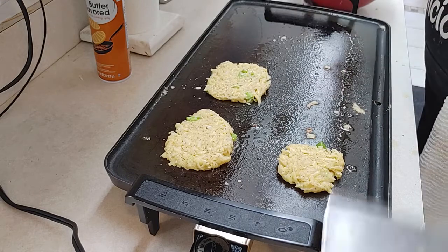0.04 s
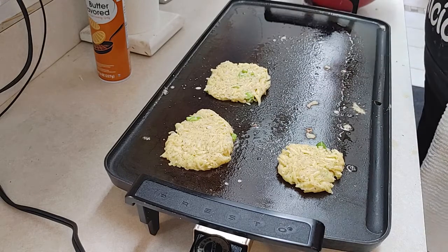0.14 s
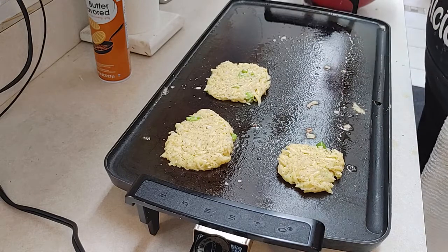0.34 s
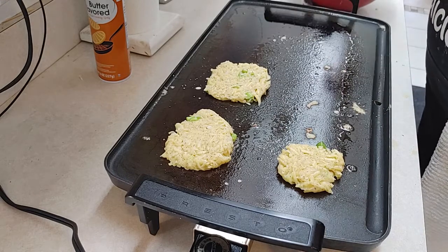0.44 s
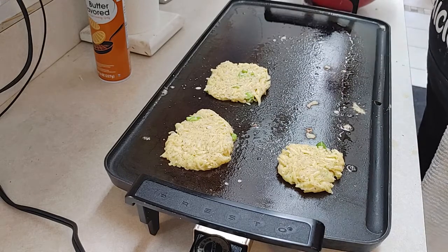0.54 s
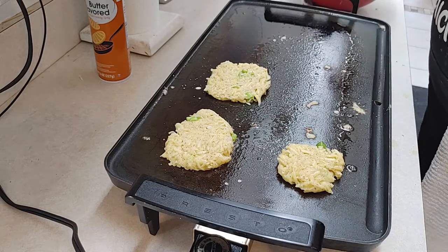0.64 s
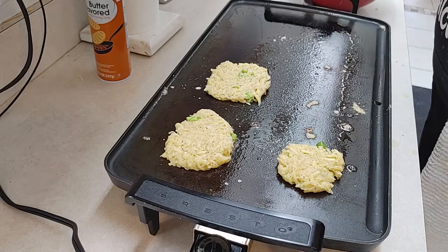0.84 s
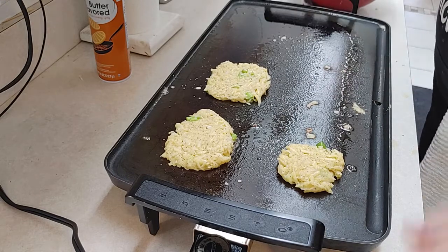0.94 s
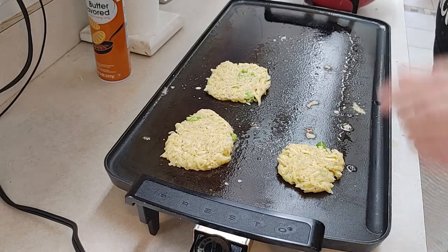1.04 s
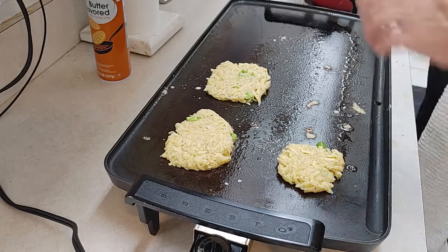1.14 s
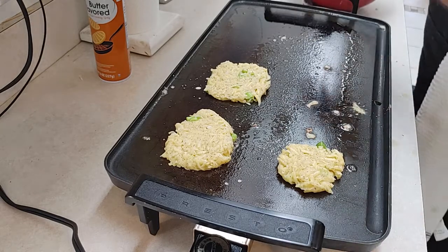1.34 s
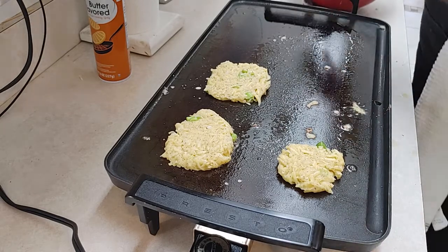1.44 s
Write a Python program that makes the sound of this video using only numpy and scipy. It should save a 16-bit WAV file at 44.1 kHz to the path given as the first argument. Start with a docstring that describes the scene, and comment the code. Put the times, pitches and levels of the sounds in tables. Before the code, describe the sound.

Metal spatula strikes a griddle with a ring, drags, then rattles to rest amid quiet frying.

```python
"""A metal spatula clinks on an electric griddle and rings, is dragged along it, then clatters to rest.
Clink: decaying blade modes, frame thud and a noise burst. Drag: random slips shake blade and plate,
plate modes sing, single tones squeal. Clatter: clicks with chatter excite blade and griddle modes.
Behind: pops of fat (filtered clicks), faint sizzle (crackle and hiss), low kitchen hum (coloured noise)."""
import sys
import numpy as np
from scipy import signal
from scipy.fft import rfft, irfft
from scipy.io import wavfile

SR = 44100
rng = np.random.default_rng(int(sys.argv[2]) if len(sys.argv) > 2 else 0)


def store_pcm(level_fs):
    """Save levels as 16-bit WAV."""
    pcm = np.round(np.clip(level_fs, -1, 1) * 32767).astype(np.int16)
    wavfile.write(sys.argv[1], SR, np.atleast_2d(pcm).T)


N = 66150
TIME = np.arange(N) / SR
HALVES = np.array([[.5], [-.5]])   # splits a left-right difference over the pair
CLINK_S, TOUCH_S = .1592, .3228   # blade strikes, then lands again and starts to slide
CONTACT_T60_S, ROOM_DB, ROOM_T60_S = 0.033, -7, 0.38   # shared by drag and clatter


def from_db(db):
    """Decibels to gain."""
    return 10 ** (np.asarray(db) / 20)


def rms_one(x):
    """Scale to rms 1."""
    return x / np.sqrt(np.mean(x ** 2) + 1e-20)


def at_hz(points, hz):
    """Read a table on a log-frequency axis."""
    f, value = np.transpose(points)
    return np.interp(np.log(hz + 1e-3), np.log(f), value)


def panned(db):
    """Left and right gains for a left-right difference."""
    return from_db(HALVES * db)


def through(x, response):
    """Convolve a signal with a stereo response."""
    return signal.fftconvolve(np.atleast_2d(x), response, axes=1)[:, :N]


def low_pass(x, hz):
    """First-order low-pass."""
    return signal.sosfilt(signal.butter(1, min(hz, SR / 3), fs=SR, output="sos"), x + 1e-18)


def high_pass(x, hz):
    """Second-order high-pass."""
    return signal.sosfilt(signal.butter(2, hz, "high", fs=SR, output="sos"), x + 1e-18)


def waver(hz):
    """Random motion, low-passed twice at hz; rms 1."""
    return rms_one(low_pass(low_pass(rng.standard_normal(N), hz), hz))


# microphone pair: (frequency [Hz], left-right likeness)
LIKENESS = [(100, 0.97), (350, 0.8), (700, 0), (1800, 0.05), (4000, 0.23), (9000, 0.06)]
# microphone pair: (frequency [Hz], left-right difference [dB])
BALANCE = [(150, -0.5), (600, -0.5), (1500, -1), (3300, -3), (7000, 0), (13000, 4)]


def noise(colour):
    """Coloured noise as the microphone pair hears it; rms 1."""
    hz = np.arange(N // 2 + 1) * SR / N
    mid, side = rfft(rng.standard_normal((2, N)))
    alike = np.clip(at_hz(LIKENESS, hz), -1, 1)
    pair = np.sqrt(1 + alike) * mid + np.sqrt(1 - alike) * side * [[1], [-1]]
    spectrum = pair * from_db(at_hz(colour, hz)) * panned(at_hz(BALANCE, hz))
    return rms_one(irfft(spectrum, N))


def narrow_band(hz, width_hz):
    """Stereo noise in a resonance whose centre may move; rms about 1."""
    phase = 2 * np.pi * np.cumsum(hz * np.ones(N)) / SR
    return np.array([waver(width_hz) * np.sin(phase) + waver(width_hz) * np.cos(phase) for _ in range(2)])


def dying(t60, start=0):
    """Envelope that jumps to 1 and decays 60 dB in t60."""
    return (TIME >= start) * np.exp(-np.log(1000) * np.maximum(TIME - start, 0) / t60)


def ring(hz, t60, pan_db=0, lead=0, start=0):
    """One struck mode in stereo; the left leads in phase by lead [rad]."""
    wave = np.sin(2 * np.pi * hz * (TIME - start) + HALVES * lead)
    return panned(pan_db) * dying(t60, start) * wave


def crack(colour, t60, room_db, room_t60):
    """Contact response: a short dense burst and its room tail; unit energy."""
    burst = dying(t60) / np.sqrt(t60)
    room = from_db(room_db) * dying(room_t60) / np.sqrt(room_t60)
    return rms_one(noise(colour) * np.hypot(burst, room)) / np.sqrt(N)


def grains(per_s, spread_db):
    """Random clicks of uneven size; rms 1."""
    sizes = from_db(spread_db * np.minimum(rng.exponential(1, N), 4)) * rng.choice([-1, 1], N)
    return rms_one(sizes * (rng.random(N) < per_s / SR))


# blade modes: frequency [Hz]
BLADE_HZ = [1659, 2591, 3612, 4404, 4871, 6386, 7048, 8172, 10311, 10548, 12025, 12772]
# same modes: (level [dB], free t60 [s], left-right difference [dB], left lead [rad])
BLADE = [(-29.5, 1, 3, 0.5), (-28, 0.8, -7.5, -1.75), (-23.5, 0.48, 5, 2.1), (-24.5, 0.33, 3.5, -3),
         (-21.5, 1, -5.5, 1.83), (-28, 0.52, -2.5, -1), (-21.5, 0.37, -1, 2), (-25, 0.21, 6, 9.5),
         (-20.5, 0.33, -4, 5), (-28, 0.32, -10, 2.5), (-19, 0.2, 9, 4.5), (-22, 0.2, -7, 3.5)]
# beat rate of the lower blade modes [Hz]
BEAT_HZ = [9.7, 9.1, 6.4, 4.6, 10.4, 2.7, 3.9]
BEAT_DEPTH = 0.14
RING_WANDER_HZ, RING_WANDER_SHARE = 21.5, 0.32   # rate at the third mode; scales with mode frequency
HELD_T60_S = 0.088   # while the blade touches


def free_blade():
    """The struck blade rings, directly and by wandering reflections, until it lands and is damped."""
    out = 0
    for k, (hz, (db, t60, pan_db, lead)) in enumerate(zip(BLADE_HZ, BLADE)):
        beat = 1
        if k < len(BEAT_HZ):
            beat = 1 + BEAT_DEPTH * np.cos(2 * np.pi * BEAT_HZ[k] * (TIME - CLINK_S))
        direct = beat * ring(hz, t60, pan_db, lead, CLINK_S)
        wander = narrow_band(hz, RING_WANDER_HZ * hz / BLADE_HZ[2])
        reflected = panned(pan_db) * dying(t60, CLINK_S) * wander
        out = out + from_db(db) * (direct + RING_WANDER_SHARE * reflected)
    return out * np.where(TIME < TOUCH_S, 1, dying(HELD_T60_S, TOUCH_S))


def held_blade():
    """Response of the blade while contact damps it."""
    return sum(from_db(db) * ring(hz, HELD_T60_S, pan_db, lead)
               for hz, (db, _, pan_db, lead) in zip(BLADE_HZ, BLADE))


# frame modes: (frequency [Hz], level [dB], t60 [s])
FRAME = [(133, -24, 0.19), (259.3, -28, 0.23), (381.5, -33.5, 0.27), (664, -36, 0.25), (1127, -20.5, 0.13),
         (1365, -26, 0.12)]
THUD_RISE_S = 0.01


def frame_thud():
    """Low modes of the frame, eased in under the clink."""
    modes = sum(from_db(db) * (-1) ** k * ring(hz, t60, start=CLINK_S)
                for k, (hz, db, t60) in enumerate(FRAME))
    return modes * np.clip((TIME - CLINK_S) / THUD_RISE_S, 0, 1)


# dense ring of the clink: (frequency [Hz], relative density [dB per Hz])
CLINK_COLOUR = [(60, -9), (150, -6), (400, -4.5), (750, -11.5), (1300, -2), (3000, 0.5), (6000, -4),
                (10000, -1), (16000, -11)]
SHIMMER_SPACING_HZ = 90   # mean


def shimmer():
    """Many weak plate modes at random pitches; rms 1."""
    chosen = rng.random(N // 2 + 1) < SR / N / SHIMMER_SPACING_HZ
    return rms_one(irfft(rfft(noise(CLINK_COLOUR)) * chosen, N))


CLINK_DB, CLINK_HOLD_S, CLINK_T60_S = -19.5, 0.027, 0.22
CLINK_TAIL_DB, CLINK_TAIL_T60_S, SHIMMER_DB = -35, 0.48, -27.5


def clink():
    """One hard blow: blade ring, frame thud, dense burst and weak modes that outlast it."""
    release_s = CLINK_S + CLINK_HOLD_S
    burst = np.where(TIME < release_s, TIME >= CLINK_S, dying(CLINK_T60_S, release_s))
    tail = dying(CLINK_TAIL_T60_S, CLINK_S)
    shape = from_db(CLINK_DB) * burst + from_db(CLINK_TAIL_DB) * tail
    dense = shape * noise(CLINK_COLOUR)
    return free_blade() + frame_thud() + dense + from_db(SHIMMER_DB) * tail * shimmer()


# griddle modes: (frequency [Hz], level [dB])
GRIDDLE = [(610, -17.5), (690, -14.5), (1415, -8.5), (1830, -5), (1910, -14.5), (2080, -7.5), (2592, -2),
           (2850, -11), (3634, -5), (4570, -9), (5830, -7), (7070, -12.5), (8570, -7), (10550, -8)]
GRIDDLE_T60_S, GRIDDLE_LEAD_RAD = 0.16, 0.67


def griddle():
    """Response of the cooking plate, its ring cut short by the food on it."""
    return sum(from_db(db) * ring(hz, GRIDDLE_T60_S, at_hz(BALANCE, hz), GRIDDLE_LEAD_RAD * (-1) ** k)
               for k, (hz, db) in enumerate(GRIDDLE))


SING_DB, SING_WIDTH_HZ, SING_SWELL_DB, SING_BEND = -32.5, 37.4, 4, 0.00605   # bend: rms share of pitch
SWELL_HZ = 9.1
RUB_LOW_CUT_HZ = 1400


def singing_plate():
    """As the contact point travels, each plate mode swells, fades and bends on its own."""
    out = 0
    for hz, db in GRIDDLE:
        swell = rms_one(from_db(SING_SWELL_DB * waver(SWELL_HZ)))
        moving_hz = hz * (1 + SING_BEND * waver(SWELL_HZ))
        mode = panned(at_hz(BALANCE, hz)) * narrow_band(moving_hz, SING_WIDTH_HZ)
        out = out + from_db(db) * swell * mode
    return from_db(SING_DB) * high_pass(out, RUB_LOW_CUT_HZ)


REFLECTION_S, REFLECTION_SHRINK_PER_S, REFLECTION_GAIN = 0.0021, 0.614, 0.41   # delay at touch


def swept(x):
    """A close plate reflection, its path shortening as the blade slides, cuts dips that climb."""
    delay = REFLECTION_S * np.exp(-REFLECTION_SHRINK_PER_S * (TIME - TOUCH_S))
    return x + REFLECTION_GAIN * np.array([np.interp(TIME - delay, TIME, side) for side in x])


# force of the drag: (time [s], level [dB])
DRAG = [(.323, 0.5), (.36, 1.5), (.41, -3), (.455, 1.5), (.51, -2), (.595, -3.5), (0.644, -5.5), (.69, -13),
        (.73, -16)]
# scrape spectrum: (frequency [Hz], relative level [dB])
SCRAPE_COLOUR = [(1000, -54), (1500, -10), (2200, 2.5), (3200, -5.5), (5000, -3.5), (9000, -8),
                 (12000, -17), (16000, -13)]
SLIPS_PER_S, SLIP_SPREAD_DB = 2500, 4
SCRAPE_DB, SCRAPE_BLADE_DB = -32, -40
RUB_UNEVEN_DB, RUB_UNEVEN_HZ = 1, 71   # pressure flutters as the edge catches
BITE_DB, BITE_T60_S, BITE_LOW_HZ, BITE_HIGH_HZ = -27.5, 0.25, 2130, 2650


def scrape():
    """The edge bites, then slips thousands of times a second, shaking blade and plate."""
    s, db = np.transpose(DRAG)
    sliding = (TIME > TOUCH_S) * (TIME < s[-1])
    force = from_db(np.interp(TIME, s, db) + RUB_UNEVEN_DB * waver(RUB_UNEVEN_HZ)) * sliding
    blade = from_db(SCRAPE_BLADE_DB) * rms_one(held_blade()) / np.sqrt(N)
    contact = high_pass(crack(SCRAPE_COLOUR, CONTACT_T60_S, ROOM_DB, ROOM_T60_S), RUB_LOW_CUT_HZ)
    body = blade + from_db(SCRAPE_DB) * contact
    slips = swept(through(force * grains(SLIPS_PER_S, SLIP_SPREAD_DB), body))
    band = signal.butter(2, [BITE_LOW_HZ, BITE_HIGH_HZ], "band", fs=SR, output="sos")
    bite = dying(BITE_T60_S, TOUCH_S) * rms_one(signal.sosfilt(band, noise(SCRAPE_COLOUR)))
    return slips + force * singing_plate() + from_db(BITE_DB) * bite


# edge grips, one resonance sings: (middle [s], length [s], frequency [Hz], level [dB])
SQUEALS = [(0.344, 0.05, 2592, -27), (0.444, 0.099, 668, -47), (0.465, 0.051, 2592, -28),
           (0.501, 0.043, 1900, -27), (0.586, 0.038, 671, -42.5), (0.644, 0.11, 788, -47),
           (0.657, 0.046, 1880, -31.5), (0.711, 0.048, 1950, -36.5), (0.799, 0.0094, 2010, -16.5),
           (0.815, 0.04, 2595, -23), (0.864, 0.052, 687, -43.5), (0.877, 0.06, 1874, -42.5)]
SQUEAL_WAVER_HZ = 14.5   # rms pitch deviation


def squeals():
    """Stick-slip tones swell and fade, slightly unsteady in pitch."""
    out = np.zeros((2, N))
    for s, length, hz, db in SQUEALS:
        phase = 2 * np.pi * np.cumsum(hz + SQUEAL_WAVER_HZ * waver(63)) / SR
        level = from_db(db + RUB_UNEVEN_DB * waver(RUB_UNEVEN_HZ))
        swell = level * np.exp(-(2 * (TIME - s) / length) ** 2)
        out += swell * panned(at_hz(BALANCE, hz)) * np.sin(phase + HALVES * GRIDDLE_LEAD_RAD)
    return out


# knocks of blade on griddle: (time [s], level [dB], chatter length [s], treble [dB])
KNOCKS = [(0.3248, -12.5, 0.0054, 9), (0.733, 1, 0.0071, -17), (0.7384, -5, 0.0087, 8),
          (0.7441, 3.5, 0.0028, -1), (0.7481, 1.5, 0.0085, -1.5), (0.764, -0.5, 0.014, -5.5),
          (0.7836, -1, 0.006, -0.5), (0.7888, 1.5, 0.0087, -2), (0.7956, -1, 0.008, 4),
          (.809, -1.5, 0.014, -23), (0.825, -0.5, 0.0058, -3.5), (0.857, -8, 0.012, -22),
          (0.866, -11, 0.0015, -4)]
# knock spectrum: (frequency [Hz], relative level [dB])
KNOCK_COLOUR = [(250, -10.5), (620, -0.5), (1000, -6.5), (1900, 5), (3000, 3), (5000, -1), (7500, -3.5),
                (10300, 1.5), (12000, -8), (16000, -15)]
KNOCK_DB, KNOCK_BLADE_DB, KNOCK_GRIDDLE_DB, CHATTER_DB, TREBLE_HZ = 3, -15, -35.5, 0, 3500


def clatter():
    """Each knock is a click plus milliseconds of chatter, exciting contact, blade and griddle."""
    force = np.zeros(N)
    for s, db, length, treble_db in KNOCKS:
        span = (TIME > s) * (TIME < s + max(length, 1e-3))
        chatter = rms_one(rng.standard_normal(N) * span) / np.sqrt(N)
        touch = from_db(CHATTER_DB) * chatter
        touch[int(s * SR)] += 1
        dull = low_pass(touch, TREBLE_HZ)
        force += from_db(db) * (dull + from_db(treble_db) * (touch - dull))
    body = from_db(KNOCK_DB) * crack(KNOCK_COLOUR, CONTACT_T60_S, ROOM_DB, ROOM_T60_S)
    modes = from_db(KNOCK_BLADE_DB) * held_blade() + from_db(KNOCK_GRIDDLE_DB) * griddle()
    return through(force, body + modes)


# pops of fat: (time [s], level [dB], low snap [dB re pop], left-right difference [dB])
POPS = [(0.064, -11.5, -18, 1), (0.0816, -1, -29, 3), (0.1073, -6, -37, 1.5), (0.114, -11.5, -6.5, 3),
        (1.025, -16.5, -18, -5), (1.044, -19, -18, -1), (1.0928, -17, -4, 0), (1.1463, -8.5, -8.5, -7.5),
        (1.1626, -21, -29, 4), (1.244, -16, -20, 0), (1.2765, -6, -16, 0.5), (1.371, -13.5, -20, 1),
        (1.3944, -12.5, -9, -5), (1.433, -15.5, -20, 10)]
# pop spectrum: (frequency [Hz], relative level [dB])
POP_COLOUR = [(500, -44), (2500, -12), (4500, -3.5), (9000, 4.5), (13000, 2.5), (16000, 0.5)]
POP_T60_S, POP_ROOM_DB, POP_ROOM_T60_S, SNAP_HZ = 0.0073, 1.5, 0.075, 3550


def pops():
    """Droplets burst in the fat: a bright tick plus a low-passed snap of its own level."""
    out = np.zeros((2, N))
    for s, db, snap_db, pan_db in POPS:
        click = from_db(db) * (np.arange(N) == int(s * SR))
        tick = through(click, crack(POP_COLOUR, POP_T60_S, POP_ROOM_DB, POP_ROOM_T60_S))
        out += panned(pan_db) * (tick + from_db(snap_db) * low_pass(click, SNAP_HZ))
    return out


# sizzle spectrum: (frequency [Hz], relative level [dB])
SIZZLE = [(700, -15), (1500, -7.5), (3000, -6), (5500, 0.5), (9000, 1), (12500, -5), (16000, -6.5)]
SIZZLE_DB, SIZZLE_SURGE_DB = -49, 3
CRACKLE_DB, CRACKLES_PER_S, CRACKLE_SPREAD_DB = -50, 200, 4.5


def sizzle():
    """Fine crackle over an uneven hiss of steam."""
    crackle = np.zeros((2, N))
    for _ in range(3):   # three stereo responses share the crackles
        clicks = grains(CRACKLES_PER_S / 3, CRACKLE_SPREAD_DB)
        crackle += through(clicks, crack(SIZZLE, POP_T60_S, POP_ROOM_DB, POP_ROOM_T60_S))
    hiss = from_db(SIZZLE_DB + SIZZLE_SURGE_DB * waver(SWELL_HZ)) * noise(SIZZLE)
    return from_db(CRACKLE_DB) * rms_one(crackle) + hiss


# kitchen hum spectrum: (frequency [Hz], relative level [dB])
KITCHEN = [(55, -1.5), (85, -15.5), (120, 4.5), (170, -7), (280, -1), (420, -3.5), (750, -10.5),
           (4000, -39.5)]
KITCHEN_DB, KITCHEN_SURGE_DB = -54, 1.5


def kitchen():
    """Low room hum: coloured noise, uneven in level."""
    return from_db(KITCHEN_DB + KITCHEN_SURGE_DB * waver(SWELL_HZ)) * noise(KITCHEN)


CONTACT_LOW_CUT_HZ = 340


def scene():
    """Spatula, frying and room hum; the light contacts carry little bass."""
    contact = scrape() + squeals() * (TIME > TOUCH_S) + clatter()
    return clink() + high_pass(contact, CONTACT_LOW_CUT_HZ) + pops() + sizzle() + kitchen()


RUMBLE_CUT_HZ, CUTOFF_HZ = 78, 16000


def record(dry):
    """Rumble is removed and the top is cut steeply."""
    x = high_pass(dry, RUMBLE_CUT_HZ)
    return signal.sosfilt(signal.ellip(10, .1, 80, CUTOFF_HZ, fs=SR, output="sos"), x)


dry = scene()
out = record(dry)
store_pcm(out)
```